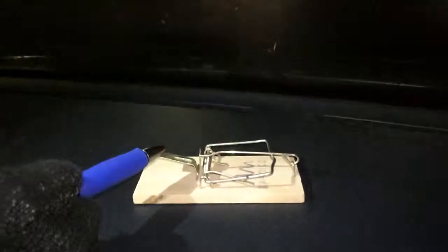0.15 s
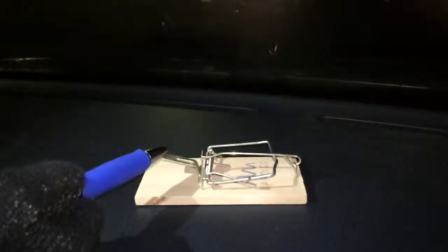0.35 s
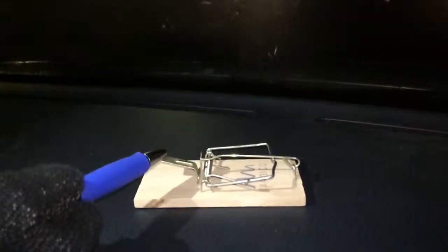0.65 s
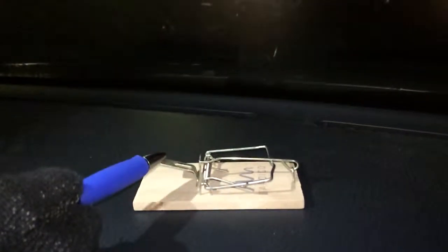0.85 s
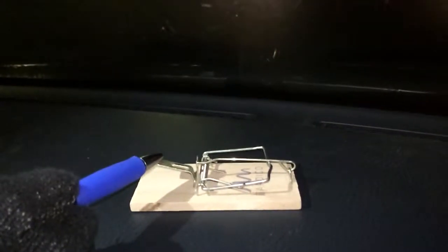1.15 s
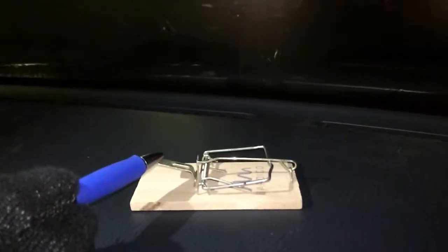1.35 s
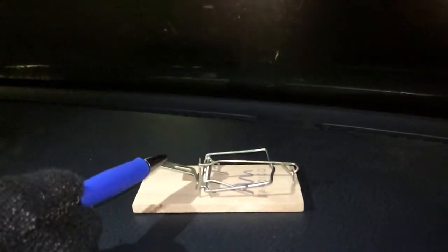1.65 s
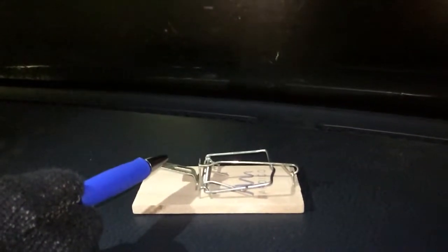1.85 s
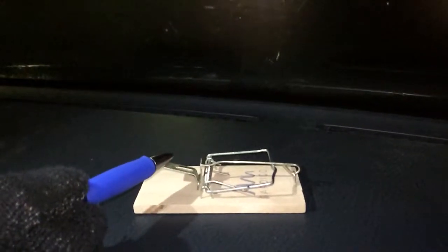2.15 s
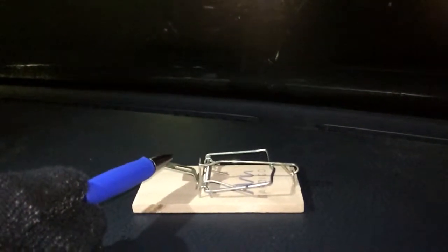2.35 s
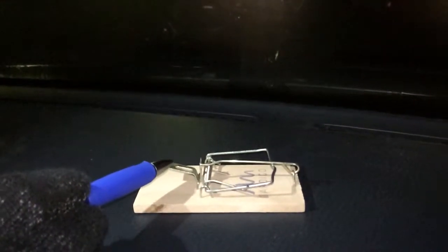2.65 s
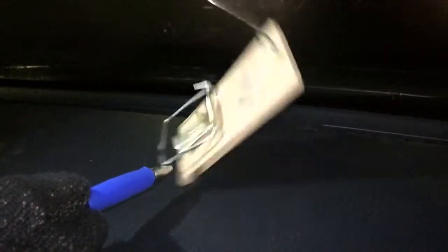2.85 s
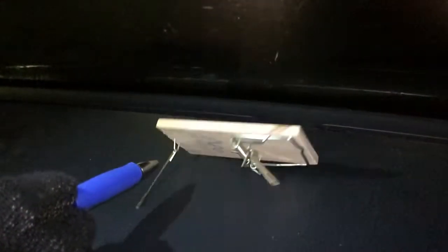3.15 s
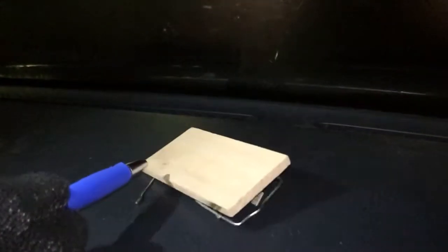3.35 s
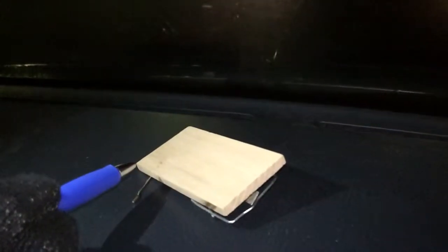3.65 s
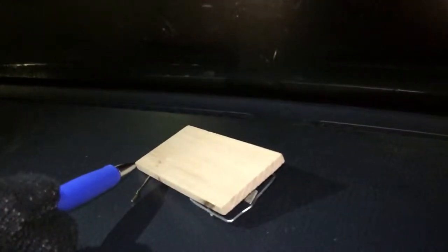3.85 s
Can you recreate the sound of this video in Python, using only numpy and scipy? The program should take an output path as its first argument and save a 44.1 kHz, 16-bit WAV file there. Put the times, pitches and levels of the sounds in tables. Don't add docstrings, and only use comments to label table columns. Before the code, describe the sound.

A mousetrap snaps on a car dashboard, heard close with a short, tight cabin echo. Until 2.9 seconds there is only low traffic rumble, soft hiss, faint rapid watch ticking and barely audible squeaks before 1 second. The metal bar then slams with a bright crack and ringing spring. From 3.1 to 3.5 the trap lands and bounces in hollow knocks, wooden clacks and wire chatter, then quiet background returns.

```python
import sys
import numpy as np
from scipy import signal
from scipy.fft import rfft, irfft
from scipy.io import wavfile
from scipy.ndimage import uniform_filter1d

SR = 44100
rng = np.random.default_rng(int(sys.argv[2]) if len(sys.argv) > 2 else 0)


def store_pcm(level_fs):
    pcm = np.round(np.clip(level_fs, -1, 1) * 32767).astype(np.int16)
    wavfile.write(sys.argv[1], SR, np.atleast_2d(pcm).T)


def linear_from_db(decibels):
    return 10 ** (np.asarray(decibels, float) / 20)


N = 176400

LANDING_S = 3.105


def evened(x):
    return x / np.sqrt(np.mean(x ** 2) + 1e-20)


def peaked(x, size=200):
    return x / np.sqrt(uniform_filter1d(x ** 2, size).max() + 1e-20)


def line(points):
    s, value = np.transpose(points)
    return np.interp(np.arange(N) / SR, s, value)


def coloured(x, points):
    f, db = np.transpose(points)
    hz = np.fft.rfftfreq(len(x), 1 / SR)
    gain = linear_from_db(np.interp(np.log(hz + 1), np.log(f + 1), db, -99, -99))
    return irfft(rfft(x) * gain, len(x))


def add(mix, s, sound):
    part = mix[round(s * SR):][:len(sound)]
    part += sound[:len(part)]


def ring(drive, modes, t60):
    uneven_db = 3
    out = np.zeros(len(drive))
    luck = rng.standard_normal((len(modes), 2)).clip(-2, 2)
    radius = 10 ** (-3 / (max(t60, .004) * SR))
    for (hz, db), (louder, sharper) in zip(modes, luck):
        w = 2 * np.pi * hz * (1 + sharper / 100) / SR
        mode = signal.lfilter([1, 0, -1], [1, -2 * radius * np.cos(w), radius * radius], drive)
        out += linear_from_db(db + uneven_db * louder) * mode
    return out


def burst(t60, length=.25):
    grain_db, rise_share = 3, 0.026
    strike_db, strike_s = 5, .0008
    t = np.arange(0, length, 1 / SR)
    bumps = np.repeat(rng.exponential(1, len(t) // 20 + 1), 20)[:len(t)]
    grains = linear_from_db(grain_db * bumps.clip(0, 3))
    rise = np.minimum(t / (rise_share * t60), 1)
    shape = linear_from_db(-60 * t / max(t60, .003) + strike_db * np.exp(-t / strike_s))
    return rise * shape * grains * rng.standard_normal(len(t))


# (frequency [Hz], level per Hz [dB])
RUMBLE_SPECTRUM = [(22, -42), (32, -17.5), (45, 0), (58, 0.5), (100, -8), (130, -11), (165, -23),
                   (300, -46)]
# (time [s], level [dB])
RUMBLE_LEVEL = [(.15, -53.5), (.55, -50.5), (.9, -54.5), (1.3, -51), (1.7, -48), (2.05, -48), (2.3, -49.5),
                (2.7, -49), (3.1, -49.5), (3.75, -47.5), (4, -49.5)]


def rumble():
    lump_db = 1.5
    lumps = evened(coloured(rng.standard_normal(N), [(2.5, 8.5), (8, -4), (20, -24)]))
    traffic = evened(coloured(rng.standard_normal(N), RUMBLE_SPECTRUM))
    return linear_from_db(line(RUMBLE_LEVEL) + lump_db * lumps) * traffic


# (frequency [Hz], level per Hz [dB])
HISS_SPECTRUM = [(88, -29.5), (150, -2), (393, -14), (1230, -19.5), (2040, -23.5), (2390, -21.5),
                 (4750, -31), (13500, -35.5), (16400, -45)]


def hiss():
    return linear_from_db(-66.5) * evened(coloured(rng.standard_normal(N), HISS_SPECTRUM))


# (time [s], length [s], pitch [Hz], level [dB])
SQUEAKS = [
    (.535, .06, 1250, -75),
    (.61, .035, 1260, -78),
    (.43, .05, 500, -72),
    (.89, .05, 230, -66),
]


def squeaks():
    out = np.zeros(N)
    for s, length, hz, db in SQUEAKS:
        t = np.arange(0, length, 1 / SR)
        swell = np.sqrt(np.sin(np.pi * t / length))
        add(out, s, linear_from_db(db) * swell * np.sin(2 * np.pi * hz * t))
    return out


# (frequency [Hz], level [dB])
WATCH_MODES = [(9300, 0), (10300, -7), (7200, -9)]


def watch():
    first_s, ticks_per_s = .164, 6
    tick_db, tock_db = -78.5, -76
    out = np.zeros(N)
    for k in range(24):
        db = (tock_db if k % 2 else tick_db) + rng.uniform(-2, 2)
        tap = burst(0.032, length=.06)
        add(out, first_s + k / ticks_per_s, linear_from_db(db) * peaked(ring(tap, WATCH_MODES, 0.021)))
    return out


# (time [s], pitch [Hz], level [dB])
SPRING = [
    [(2.932, 2992, -26), (2.945, 2990, -25), (2.97, 3000, -38), (3.0, 3030, -45), (3.015, 3070, -66)],
    [(3.111, 2998, -27), (3.13, 3000, -31), (3.15, 2990, -37), (3.168, 2985, -30), (3.182, 2980, -31),
     (3.19, 3010, -44), (3.21, 3030, -40), (3.224, 3020, -40)],
    [(3.225, 3040, -18), (3.231, 3043, -21), (3.238, 3030, -35), (3.257, 3030, -42), (3.275, 3000, -36),
     (3.297, 3040, -39.5), (3.302, 3060, -33), (3.318, 3100, -37)],
    [(3.365, 3010, -20), (3.372, 3010, -16), (3.385, 3000, -29), (3.4, 2990, -34.5), (3.42, 2980, -48),
     (3.46, 2977, -56)],
]


def spring():
    width_hz, fuzz = 40, .2
    t, out = np.arange(N) / SR, np.zeros(N)
    size = max(int(SR / width_hz), 2)
    noises = rng.standard_normal((2, N))
    a, b = (evened(uniform_filter1d(uniform_filter1d(v, size), size)) for v in noises)
    waver = 1 + fuzz * (a + 1j * b)
    for rows in SPRING:
        s, hz, db = np.transpose(rows)
        turn = np.exp(2j * np.pi * np.cumsum(np.interp(t, s, hz)) / SR)
        gate = np.clip((t - s[0]) / 0.0013, 0, 1) * np.clip((s[-1] - t) / .004 + 1, 0, 1)
        out += np.sqrt(2) * gate * linear_from_db(np.interp(t, s, db)) * (turn * waver).real
    return out


# (time [s], peak level [dB], chatter t60 [s])
STAPLE_HITS = [(2.9307, -14, 0.016), (2.9344, -8.5, 0.024), (2.9414, -13, 0.018), (2.9544, -23, 0.018),
               (2.9764, -34, 0.018), (3.0185, -43, 0.018), (3.0335, -37, 0.018), (3.0435, -32, 0.018),
               (3.0624, -49, 0.018), (3.1054, -26, 0.015), (3.1134, -25, 0.02), (3.1373, -19, 0.021),
               (3.1572, -13, 0.018), (3.1872, -32, 0.018), (3.3174, -7.5, 0.015), (3.3284, -24, 0.018),
               (3.3393, -18.5, 0.018), (3.3482, -21, 0.017), (3.3643, -18.5, 0.021), (3.3964, -26.5, 0.018),
               (3.4154, -34, 0.018), (3.4304, -33, 0.018), (3.4444, -40, 0.018), (3.4554, -43, 0.018),
               (3.4925, -26.5, 0.017), (3.5299, -55, 0.018), (3.5414, -63, 0.018)]
# (frequency [Hz], level [dB])
STAPLE = [(3550, -4.5), (3800, -1), (4040, 1), (4450, -9)]


def staple_ticks():
    out = np.zeros(N)
    for s, db, t60 in STAPLE_HITS:
        tick = ring(burst(t60, length=.1), STAPLE, .015)
        add(out, s, linear_from_db(db - 2.5) * peaked(tick, size=60))
    return out


# (time [s], level [dB])
SHIVER = [
    [(2.905, -54.5), (2.95, -34.5), (3.0, -52.5), (3.1, -57)],
    [(3.105, -25.5), (3.15, -34.5), (3.222, -52), (3.24, -43), (3.315, -38.5)],
    [(3.318, -23.5), (3.38, -36.5), (3.43, -41), (3.46, -57.5), (3.492, -64)],
]
# (frequency [Hz], level [dB])
WIRE = [(6130, -3), (6520, 0), (6900, -1), (7380, 1), (8190, -5), (8800, -5), (9470, -5), (10550, -6),
        (11000, -7), (11850, -5), (12500, -7), (13250, -6), (13900, -8), (14800, -9)]
# (frequency [Hz], level [dB])
BOARD = [(2740, -7.5), (2980, -3), (3090, -5.5), (3230, -3.5)]
# (frequency [Hz], level [dB])
CLACK = [(740, 5), (860, 9), (1040, 4), (1230, 9.5), (1480, 6.5), (1760, 7), (2100, -11)]
# (frequency [Hz], level [dB])
KNOCK = [(195, 1.5), (255, 2.5), (310, 5.5), (400, 1.5), (480, -1.5), (550, -5.5), (620, -4.5)]
# (frequency [Hz], level per Hz [dB])
CRACK = [(500, -69.5), (2300, -17), (3300, -11), (4300, -10), (5200, -8.5), (6900, -4), (13500, -8.5),
         (21000, -40.5)]
WIRE_T60_S, BOARD_T60_S, STAPLE_T60_S = 0.037, 0.045, 0.029
KNOCK_T60_S, BOOM_T60_S, CLACK_T60_S = .06, 0.13, 0.018


def shiver():
    clicks_per_s, flurry_db = 2800, 2.5
    t = np.arange(N) / SR
    clicks = (rng.random(N) < clicks_per_s / SR) * rng.choice([-1, 1], N)
    clicks = clicks * linear_from_db(3.5 * rng.exponential(1, N).clip(0, 3))
    flurries = evened(uniform_filter1d(rng.standard_normal(N), size=150)).clip(-2, 2)
    clicks = clicks * linear_from_db(flurry_db * flurries)
    level = sum(linear_from_db(line(c)) * (t > c[0][0]) * (t < c[-1][0]) for c in SHIVER)
    wires = evened(ring(clicks, WIRE, WIRE_T60_S / 2))
    cracks = evened(coloured(clicks, CRACK))
    board = linear_from_db(2) * evened(ring(clicks, BOARD, STAPLE_T60_S))
    base = linear_from_db(-5.5) * evened(ring(clicks, CLACK, CLACK_T60_S))
    dashboard = linear_from_db(8) * evened(ring(clicks, KNOCK, KNOCK_T60_S))
    return level * (wires + cracks + board + (base + dashboard) * (t > LANDING_S))


# (time [s], wire level [dB], board level [dB], chatter t60 [s])
SNAP = [(2.8105, -57.5, -71, 0.019), (2.8995, -59, -66, .05), (2.906, -52, -62.5, 0.049),
        (2.9212, -17, -30, 0.1), (2.929, -12, -12.5, 0.056), (2.9345, -18, -9, 0.036),
        (2.9427, -18.5, -26.5, 0.052), (2.954, -18, -34.5, 0.018), (2.9578, -19, -20.5, 0.043),
        (2.9755, -25, -42, 0.043), (2.9858, -26.5, -56, .04), (2.9962, -38, -38, 0.023),
        (3.0168, -41, -65, .05), (3.034, -35, -45, 0.014), (3.0435, -36.5, -53, 0.033),
        (3.0635, -47, -49.5, 0.018), (3.0827, -51, -52.5, 0.018)]
# (time [s], wire level [dB], board level [dB], chatter t60 [s])
TUMBLE = [(3.106, -42.5, -35, 0.016), (3.109, -24.5, -44, 0.037), (3.1132, -33.5, -25, 0.024),
          (3.124, -27.5, -31, 0.05), (3.137, -25.5, -31, 0.076), (3.1576, -17.5, -21, 0.046),
          (3.1606, -26.5, -35, 0.075), (3.187, -28, -40.5, 0.079), (3.2107, -54, -28, 0.013),
          (3.224, -28.5, -23, 0.062), (3.2376, -26, -33, 0.04), (3.246, -36, -39.5, 0.016),
          (3.2715, -32.5, -36, 0.039), (3.2985, -48, -31.5, 0.028), (3.3177, -21, -17.5, 0.006),
          (3.321, -34, -33, 0.056), (3.333, -31.5, -17, 0.076), (3.350, -14.5, -27, 0.02),
          (3.365, -23, -20.5, 0.049), (3.3831, -34, -25.5, 0.03), (3.3968, -35, -27, 0.046),
          (3.416, -39, -30.5, 0.036), (3.4445, -68, -36, 0.013), (3.4556, -67, -38, 0.014),
          (3.4923, -37.5, -39, 0.015), (3.499, -50, -47, .02), (3.5306, -80, -67.5, 0.0071),
          (3.5418, -77, -69, .008)]


def contacts():
    crack_db, staple_db = 2, -13.5
    out = np.zeros(N)
    for s, wire_db, board_db, t60 in SNAP + TUMBLE:
        drive = burst(t60)
        fade = np.linspace(1, -1, len(drive)).clip(0)
        wire = peaked(ring(drive, WIRE, WIRE_T60_S))
        wire += linear_from_db(crack_db) * fade * peaked(coloured(np.roll(drive, 20), CRACK))
        wire += linear_from_db(staple_db) * peaked(ring(drive, STAPLE, STAPLE_T60_S))
        board = peaked(ring(burst(t60 / 2), BOARD, BOARD_T60_S))
        add(out, s, linear_from_db(wire_db) * wire + linear_from_db(board_db) * board)
    return out


# (time [s], knock level [dB], boom level [dB], clack level [dB])
BLOWS = [(2.811, -47.5, -48.5, -87), (2.908, -50, -36.5, -53.5), (2.919, -22, -17, -35),
         (2.9282, -18, -35, -11), (2.934, -11, -33.5, -4.5), (2.974, -42.5, -27.5, -32),
         (3.014, -70, -42, -55), (3.096, -56, -36.5, -49.5), (3.109, -3, -23, -10), (3.12, -12, -24.5, -22),
         (3.1568, -0.5, -17, -10.5), (3.172, -19, -27.5, -44), (3.209, -48, -27, -52),
         (3.223, -22.5, -22, -43.5), (3.239, -31.5, -28.5, -54.5), (3.268, -23.5, -22.5, -68),
         (3.286, -26, -48.5, -50), (3.3155, -14.5, -42.5, -17.5), (3.332, -8.5, -38, -46.5),
         (3.345, -16.5, -25, -31), (3.365, -24, -50, -23), (3.414, -26, -33.5, -54),
         (3.45, -27.5, -50, -46), (3.468, -28.5, -50, -51), (3.49, -32.5, -44, -52),
         (3.503, -36.5, -50, -62)]
# (frequency [Hz], level [dB])
BOOM = [
    [(100, 16)],
    [(118, -5), (134, 6)],
]
# (frequency [Hz], level [dB])
SLAM = [(400, 3.5), (780, 6.5), (1130, 6), (1450, 2.5), (1830, 5.5), (2150, 2), (2420, 0)]


def blows():
    push_s, boom_push_s, lag_s = .0008, .004, .0025
    scuff_db = -6
    out = np.zeros(N)
    for s, knock_db, boom_db, clack_db in BLOWS:
        scuff = peaked(burst(0.06, length=.4))
        t = np.arange(len(scuff)) / SR
        short_push = peaked(np.sin(np.pi * np.minimum(t / push_s, 1)) ** 2)
        slow_push = peaked(np.sin(np.pi * np.minimum(t / boom_push_s, 1)) ** 2)
        push = short_push + linear_from_db(scuff_db) * scuff
        landed = s > LANDING_S
        knock = ring(push, KNOCK, KNOCK_T60_S)
        boom = ring(slow_push, BOOM[int(landed)], BOOM_T60_S)
        clack = ring(scuff + push, CLACK if landed else SLAM, CLACK_T60_S)
        add(out, s + lag_s, linear_from_db(knock_db - 5.5) * peaked(knock, size=400))
        add(out, s + lag_s - boom_push_s / 2, linear_from_db(boom_db) * peaked(boom, size=400))
        add(out, s + lag_s, linear_from_db(clack_db - 4.5) * peaked(clack, size=400))
    return out


def cabin(x):
    cabin_db, t60_s = -18, .055
    t = np.arange(SR // 4) / SR
    tail = rng.standard_normal(len(t)) * linear_from_db(-60 * t / t60_s) * (t > .002)
    return linear_from_db(cabin_db) * signal.fftconvolve(x, tail / np.linalg.norm(tail))[:N]


def scene():
    background = rumble() + hiss() + squeaks() + watch()
    trap = shiver() + contacts() + blows()
    return (background + spring() + staple_ticks() + trap + cabin(trap))[None]


def top_cut(x):
    return signal.sosfilt(signal.butter(12, 16530, fs=SR, output="sos"), x)


def record(dry):
    start_s, edge_hz = .118, 15400
    duck_from_db, duck_share, recover_db_per_s = -31.5, .15, 26
    t = np.arange(N) / SR
    power_db = 10 * np.log10(abs(uniform_filter1d(dry[0] ** 2, 400)) + 1e-12)
    recovery_db = t * recover_db_per_s
    held_db = np.maximum.accumulate(power_db + recovery_db) - recovery_db
    duck = linear_from_db(duck_share * np.maximum(held_db - duck_from_db, 0))
    gain = np.clip((t - start_s) / 0.0036, 0, 1) / duck
    rounded = 0.75 * np.tanh(dry * gain / 0.87)
    edge = signal.firwin(161, edge_hz, window=("kaiser", 2.5), fs=SR)
    dull = signal.oaconvolve(rounded, edge[None], "same")
    return top_cut(dull)


dry = scene()
out = record(dry)
store_pcm(out)
```